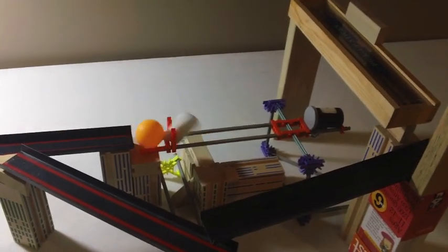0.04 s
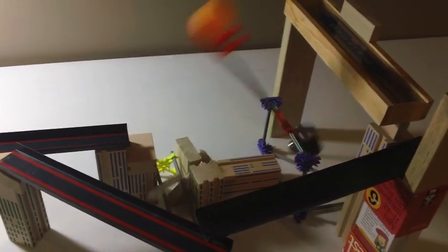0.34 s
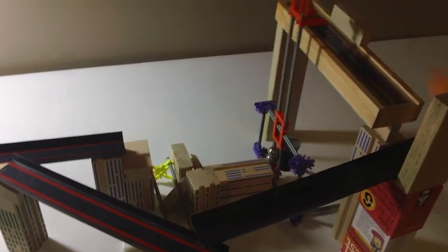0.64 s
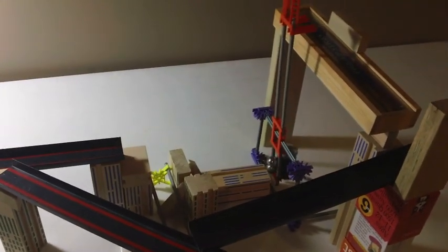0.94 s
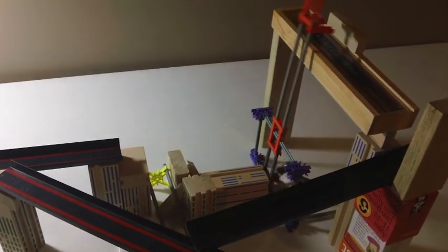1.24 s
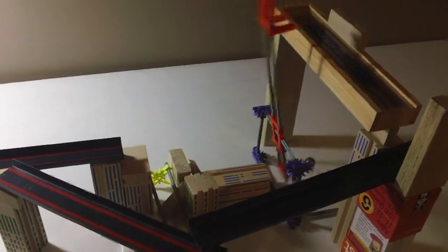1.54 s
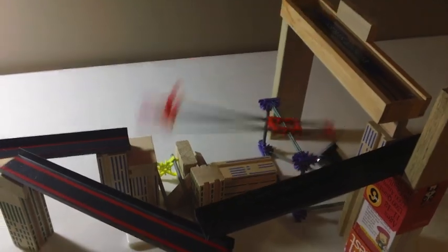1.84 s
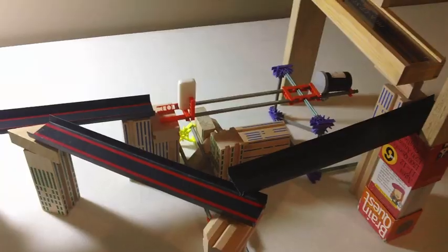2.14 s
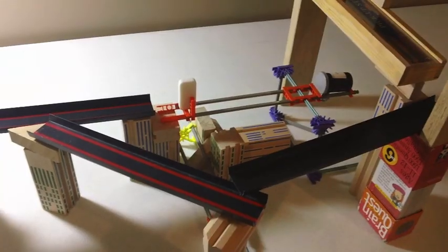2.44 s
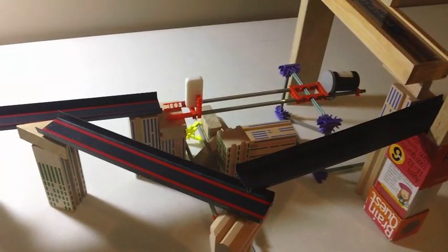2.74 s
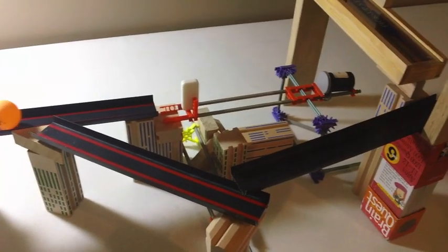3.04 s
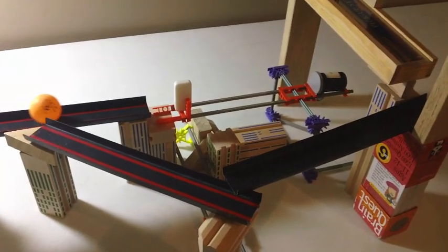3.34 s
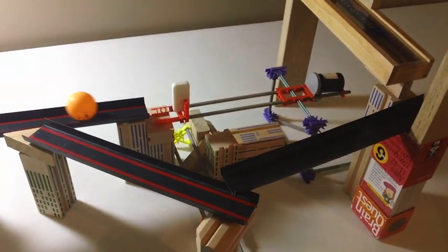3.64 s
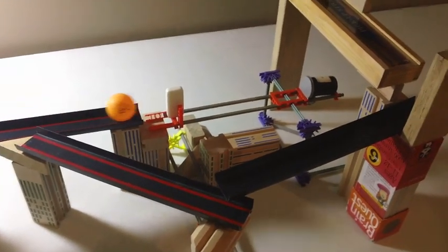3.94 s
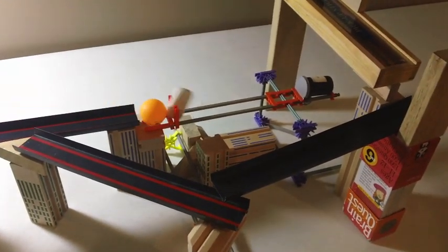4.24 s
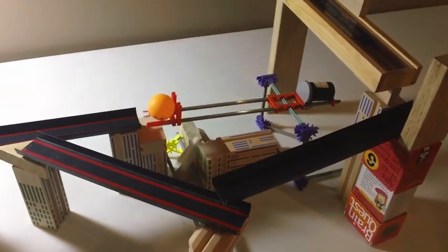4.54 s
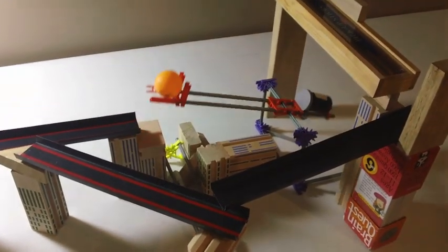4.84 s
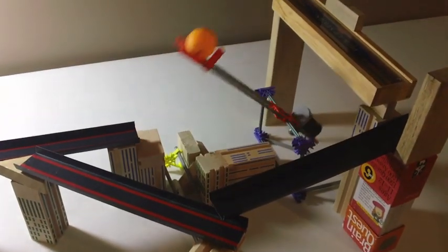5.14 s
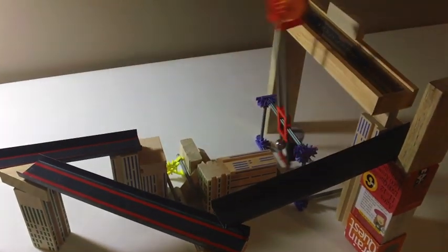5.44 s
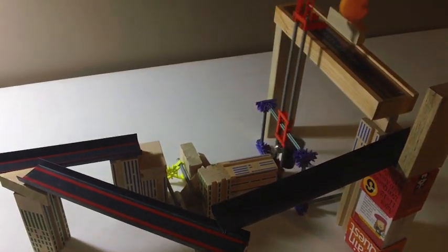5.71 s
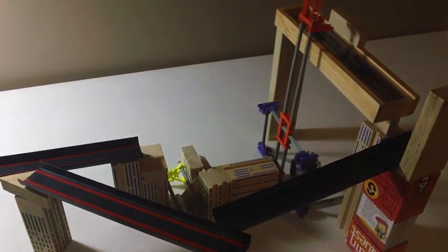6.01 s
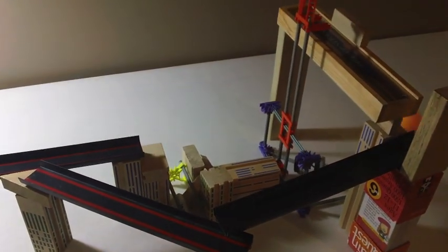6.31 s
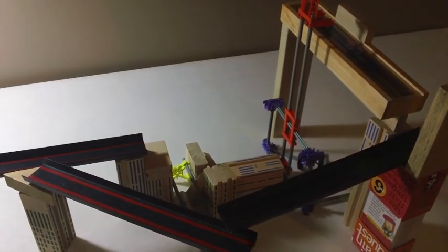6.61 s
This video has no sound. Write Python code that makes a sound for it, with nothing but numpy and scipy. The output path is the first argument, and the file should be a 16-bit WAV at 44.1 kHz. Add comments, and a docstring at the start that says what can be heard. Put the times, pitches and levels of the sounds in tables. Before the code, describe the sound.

A tabletop chain-reaction machine runs twice in a small, lively room, heard up close. First a plastic lever arm clacks and rattles, and a quick, uneven string of hard wooden knocks follows. After a short dropout and a quiet stretch of room hiss, a light ball clacks a small block over and rolls briefly, and the lever clinks. The ball then hops along a wooden trough, knocks loudly and bounces away.

```python
"""A light ball runs a tabletop chain-reaction machine: two tries, a short silence between.
It rolls onto a weighted lever arm, which tips, rattles and knocks against a wooden frame;
the ball is flung along a wooden trough and bounces away over blocks and table.
Each contact is a noise burst coloured by the struck body, with the table ringing along.
Small, lively room; a close camera with automatic gain."""
import sys
import numpy as np
from scipy import signal
from scipy.fft import rfft, irfft, next_fast_len
from scipy.io import wavfile

SR = 44100
rng = np.random.default_rng(int(sys.argv[2]) if len(sys.argv) > 2 else 0)


def store_wav(level_fs):
    """Save 16-bit WAV to argv[1]."""
    pcm = np.round(np.clip(np.atleast_2d(level_fs), -1, 1) * 32767)
    wavfile.write(sys.argv[1], SR, pcm.T.astype(np.int16))


N = 302967

# limits of the bass, thud, knock, clack and tick bands (edge [Hz])
EDGES_HZ = [60, 200, 600, 1800, 5000, 16000]
# contact spectra (frequency [Hz], gain [dB])
WOOD_EQ = [(40, -38.5), (75, -38.5), (130, -14), (200, -14), (300, 0), (850, -2), (1300, -7), (2050, -16.5),
           (2850, -10.5), (3500, -21.5), (4200, -20.5), (7000, -33.5), (15000, -38)]
PLASTIC_EQ = [(40, -23.5), (180, -17.5), (300, -4), (850, -3), (1400, -10.5), (3200, -11), (6500, -17),
              (8300, -16.5), (15000, -27)]
HOLLOW_EQ = [(40, -37.5), (250, -6.5), (800, 3.5), (1300, -3), (3000, -8), (4000, -12.5), (7000, -17),
             (15000, -24.5)]
# resonances (centre [Hz], width [Hz], lift [dB])
ARM_PEAKS = [(3900, 120, 6), (5640, 80, 7), (7150, 60, 13), (10180, 90, 17)]
BALL_PEAKS = [(8460, 130, 7), (9080, 170, 15.5), (10070, 160, 15), (11550, 850, 12), (13660, 360, 17),
              (14700, 230, 12.2)]


def amp(db):
    """Decibels to gain."""
    return 10 ** (np.asarray(db) / 20)


def unit(x):
    """Scale to rms 1."""
    return x / np.sqrt(np.mean(x ** 2) + 1e-20)


def along(points, hz):
    """Interpolate (frequency [Hz], value) on a log axis."""
    points_hz, values = np.transpose(points)
    return np.interp(np.log(hz + 1), np.log(points_hz + 1), values)


def coloured(x, eq, peaks=()):
    """Minimum-phase filter; narrow peaks lift the curve and ring on."""
    m = 2 * next_fast_len(len(x) // 2 + 2048)
    hz = np.fft.rfftfreq(m, 1 / SR)
    lift = sum(amp(db) ** 2 / (1 + (2 * (hz - centre) / width) ** 2) for centre, width, db in peaks)
    cepstrum = irfft(np.log(amp(along(eq, hz)) * np.sqrt(1 + lift)))
    cepstrum[1:m // 2] *= 2
    cepstrum[m // 2 + 1:] = 0
    return irfft(rfft(x, m) * np.exp(rfft(cepstrum)), m)[:len(x)]


def add(track, start_s, sound):
    """Mix a sound into the track."""
    part = track[max(0, round(start_s * SR)):][:len(sound)]
    part += sound[:len(part)]


def burst(t, t60_s):
    """Decaying white noise."""
    return amp(-60 * t / t60_s) * rng.standard_normal(len(t))


def air(rumble_db=-57.5, hiss_db=-59.5):
    """Steady room rumble and soft hiss."""
    # noise spectra (frequency [Hz], gain [dB])
    rumble_eq = [(15, -61.5), (25, -30.5), (54, -6), (91, -7), (124, 3.5), (159, -4), (462, -7.5),
                 (499, -8.5), (1000, -26.5), (1300, -45), (2200, -120)]
    hiss_eq = [(350, -31.5), (600, -2.5), (715, -3), (1310, -6.5), (8990, -18.5), (11500, -21),
               (12400, -26.5), (15000, -19)]
    rumble = unit(coloured(rng.standard_normal(N), rumble_eq))
    hiss = unit(coloured(rng.standard_normal(N), hiss_eq))
    return amp(rumble_db) * rumble + amp(hiss_db) * hiss


def room_tail(size):
    """Diffuse echo; treble dies first."""
    decay = [(100, 0.54), (400, 0.39), (1500, 0.37), (5000, 0.31), (15000, 0.25)]  # reverberation (frequency [Hz], t60 [s])
    hz, t, spectra = signal.stft(rng.standard_normal(size), SR, nperseg=256)
    spectra *= amp(-60 * t / along(decay, hz)[:, None])
    return signal.istft(spectra, SR, nperseg=256)[1][:size]


def table_ring(t, rise_s=0.005):
    """The table and the things on it ring, at new strengths for each blow."""
    modes = [(134, -13, 0.34), (232.8, -10, 0.24), (279, 1.5, 0.23), (351.4, -1.5, 0.26), (380, -0.5, 0.13),
             (408, -1, 0.29), (599, -8, 0.4), (782, -8.5, 0.33), (936, -10.5, 0.39)]  # (frequency [Hz], level [dB], t60 [s])
    tones = np.zeros(len(t))
    for hz, db, t60_s in modes:
        envelope = amp(db + rng.normal(0, 2) - 60 * t / t60_s)
        cycles = hz * rng.normal(1, .003) * t + rng.random()
        tones += envelope * np.sin(2 * np.pi * cycles)
    return tones * (1 - np.exp(-t / rise_s))


def band_levels(db, hardness_db_per_oct, balance_db, edges_hz):
    """Share a contact's level among the bands; harder is brighter."""
    octaves = np.log2(np.multiply(edges_hz[:-1], edges_hz[1:])) / 2
    gains = amp(balance_db + hardness_db_per_oct * octaves)
    return db + 20 * np.log10(gains / np.linalg.norm(gains))


def voiced(x, levels_db, edges_hz):
    """Filter a blow so that its first 30 ms approach the band levels."""
    head = x[:round(.03 * SR)]
    power = 2 * abs(rfft(head, SR // 10)) ** 2 / (len(head) * SR / 10)
    hz = np.fft.rfftfreq(SR // 10, 1 / SR)
    eq = [(np.sqrt(lo * hi), db - 10 * np.log10(power[(hz >= lo) & (hz < hi)].sum()))
          for lo, hi, db in zip(edges_hz, edges_hz[1:], levels_db)]
    return coloured(x, eq)


def blows(hits, balance_db, eq, peaks, crack_db, chatter_t60_s, room_db, table_db,
          crack_t60_s=0.0032, edges_hz=EDGES_HZ):
    """Crack, chatter and echo in the struck body's colour, plus table ring; gains relative to chatter."""
    track, t = np.zeros(N), np.arange(SR * 4 // 10) / SR
    for start_s, db, hardness in hits:
        crack = amp(crack_db) * burst(t, crack_t60_s)
        chatter = burst(t, chatter_t60_s)
        echo = amp(room_db) * room_tail(len(t)) * (1 - np.exp(-t / 0.0086))
        blow = coloured(crack + chatter + echo, eq, peaks) + amp(table_db) * table_ring(t)
        levels_db = band_levels(db, hardness, balance_db, edges_hz)
        for _ in range(2):  # bands overlap: two passes
            blow = voiced(blow, levels_db, edges_hz)
        add(track, start_s, blow)
    return track


def runs(spans, eq, peaks, contacts_per_s, spread_db):
    """Runs of tiny uneven contacts, blurred by the room."""
    track, t = np.zeros(N), np.arange(SR // 2) / SR
    for start_s, end_s, db in spans:
        size = round((end_s - start_s) * SR)
        touches = rng.random(size) < contacts_per_s / SR
        contacts = touches * amp(spread_db * rng.standard_normal(size))
        response = burst(t, t60_s=0.047) + amp(-11.5) * room_tail(len(t))
        run = coloured(signal.fftconvolve(contacts, response), eq, peaks)
        add(track, start_s, amp(db) * run / (np.std(run[:size]) + 1e-9))
    return track


def table_bumps():
    """Soft, dull bumps of the table."""
    hits = [(0.0, -42.5, 5.5), (.943, -29, 0.5), (1.013, -31, 3.5), (1.205, -26, -9.5), (1.352, -17, -1),
            (1.628, -22, 3), (1.885, -15, 0.5), (2.935, -41, -10.5), (3.01, -49, -7), (3.4, -47, -5),
            (5.39, -51.5, 5.5), (6.129, -22, 1), (6.192, -18.5, 4.5)]  # (time [s], level [dB], hardness [dB/oct])
    balance_db = [-8, 0, -14.5, -28, -40]  # (gain per band [dB])
    soft_eq = [(30, -13), (70, -7.5), (140, 10.5), (280, -3), (600, -11.5), (2500, -25.5), (12000, -43)]  # contact spectrum (frequency [Hz], gain [dB])
    return blows(hits, balance_db, soft_eq, [],
                 crack_db=-10.5, chatter_t60_s=.18, room_db=-5.5, table_db=-26)


def arm_rattle():
    """The loose arm rattles."""
    spans = [(.287, .36, -27), (1.2, 1.26, -41.5), (1.33, 1.44, -35.5)]  # (start [s], end [s], level [dB])
    return runs(spans, PLASTIC_EQ, ARM_PEAKS[:3], contacts_per_s=360, spread_db=-0.5)


def treble_ticks():
    """Short, bright ticks, most at the onset of a knock or jolt."""
    hits = [(1.079, -31, 9.5), (1.3145, -31, 7), (1.333, -26.5, 2), (1.855, -34, -8), (4.6998, -27.5, 9),
            (6.1111, -23, -2)]  # (time [s], level [dB], hardness [dB/oct])
    balance_db = [-10, 0]  # (clack band [dB], tick band [dB])
    tick_peaks = [(7500, 2700, 3.7), (13800, 1500, 13)]  # (centre [Hz], width [Hz], lift [dB])
    return blows(hits, balance_db, HOLLOW_EQ, tick_peaks,
                 crack_db=4.5, chatter_t60_s=0.074, room_db=-10.5, table_db=-50, edges_hz=EDGES_HZ[3:])


def lever_clinks():
    """Metal parts of the lever clink and ring."""
    hits = [(.2689, -24.5, -2), (.423, -28.5, 3.5), (4.7727, -14.5, 0)]  # (time [s], level [dB], hardness [dB/oct])
    balance_db = [-19, -2.5, 2, -2, -0.5]  # (gain per band [dB])
    metal_peaks = [(2300, 120, 6), (3080, 70, 8), (3490, 60, 8), (8510, 7, 20), (8620, 9, 15),
                   (9730, 10, 16)]  # (centre [Hz], width [Hz], lift [dB])
    return blows(hits, balance_db, PLASTIC_EQ, metal_peaks,
                 crack_db=5.5, chatter_t60_s=0.06, room_db=-12, table_db=-31.5)


def weight_jolts():
    """The weight jolts in its holder."""
    hits = [(1.1813, -18.5, 1.1), (1.191, -21, -0.1), (1.2626, -22, -0.2), (1.3155, -21, -1.3)]  # (time [s], level [dB], hardness [dB/oct])
    balance_db = [-19, -1, 1.5, 0.5, -13.5]  # (gain per band [dB])
    holder_peaks = [(3025, 150, 16.3), (3480, 99, 11), (4700, 120, 7.6)]  # (centre [Hz], width [Hz], lift [dB])
    return blows(hits, balance_db, PLASTIC_EQ, holder_peaks,
                 crack_db=3, chatter_t60_s=.072, room_db=-11, table_db=-21.5)


def arm_clacks():
    """Sharp blows on the plastic arm."""
    hits = [(.1537, -15.5, 2), (.287, -20, .2)]  # (time [s], level [dB], hardness [dB/oct])
    balance_db = [-11.5, 3.5, -2.5, -1, -5]  # (gain per band [dB])
    return blows(hits, balance_db, PLASTIC_EQ, ARM_PEAKS,
                 crack_db=17, chatter_t60_s=0.12, room_db=-7, table_db=-24, crack_t60_s=0.0025)


def ball_roll():
    """The ball rolls: dense, uneven contacts."""
    spans = [(.37, .6, -30), (4.548, 4.771, -31.5), (5.87, 5.92, -41.5), (5.97, 6.11, -35.5)]  # (start [s], end [s], level [dB])
    roll_eq = [(40, -30.5), (140, -4.5), (700, 9.5), (1400, -4), (2500, -1), (4000, -12.5), (8000, -22.5),
               (15000, -37)]  # spectrum (frequency [Hz], gain [dB])
    return runs(spans, roll_eq, [], contacts_per_s=310, spread_db=7)


def ball_pings():
    """The ball pings on plastic track and cradle."""
    hits = [(.372, -30.5, .9), (1.7625, -38.5, -0.3), (3.3444, -46.5, -0.9), (3.4112, -47.5, 1.2),
            (4.63, -29.7, 1.3), (4.6629, -31, 1.5)]  # (time [s], level [dB], hardness [dB/oct])
    balance_db = [-2, -3, -2.5, -1, -11.5]  # (gain per band [dB])
    track_peaks = [(2420, 120, 13)]  # (centre [Hz], width [Hz], lift [dB])
    return blows(hits, balance_db, HOLLOW_EQ, track_peaks,
                 crack_db=10, chatter_t60_s=0.11, room_db=-8, table_db=-21.5)


def ball_taps():
    """Light contacts ring ball and cup."""
    hits = [(.523, -22.5, -1.5), (.9683, -39.5, 1), (1.0586, -37, -0.5), (1.294, -30, -3),
            (1.5465, -27.5, 0), (1.5854, -31.5, -0.5), (4.2074, -34.5, 0.1), (4.5841, -29.5, 0.8)]  # (time [s], level [dB], hardness [dB/oct])
    balance_db = [-10, -6.5, 0, -4, -3]  # (gain per band [dB])
    cup_peaks = [(2500, 150, 4.6)]  # (centre [Hz], width [Hz], lift [dB])
    return blows(hits, balance_db, HOLLOW_EQ, BALL_PEAKS + cup_peaks,
                 crack_db=8.5, chatter_t60_s=0.087, room_db=-7.5, table_db=-22.5)


def ball_hops():
    """The ball hops along the wooden trough."""
    hits = [(5.6038, -40, 0.7), (5.6771, -29, 0), (5.7669, -27.5, 1), (5.8203, -35, 0.5),
            (5.8537, -36, -1.5), (6.014, -30.5, -2.6), (6.0762, -30, -2.5)]  # (time [s], level [dB], hardness [dB/oct])
    balance_db = [-9, -6.5, -1, 1, -7.5]  # (gain per band [dB])
    trough_peaks = [(1627, 110, 10.7), (2144, 86, 8.8), (5440, 170, 7.7)]  # (centre [Hz], width [Hz], lift [dB])
    return blows(hits, balance_db, HOLLOW_EQ, BALL_PEAKS + trough_peaks,
                 crack_db=5, chatter_t60_s=0.084, room_db=-10.5, table_db=-21.5)


def block_topple():
    """The ball tips a small block over."""
    hits = [(4.4349, -10, -0.5)]  # (time [s], level [dB], hardness [dB/oct])
    balance_db = [-14, -0.5, 1.5, -1, -11.5]  # (gain per band [dB])
    return blows(hits, balance_db, PLASTIC_EQ, [],
                 crack_db=13, chatter_t60_s=0.076, room_db=-6.5, table_db=-25.5, crack_t60_s=0.0011)


def ball_bounces(start_s=6.4897, first_db=-13.5, flight_s=.2097, restitution=.708, loss_db=2.5):
    """The ball bounces away; flights shorten and landings weaken by constant ratios."""
    balance_db = [-17.5, -2, 0.5, -9, -14.5]  # (gain per band [dB])
    block_peaks = [(1230, 65, 3.5), (1970, 64, 5.1), (2820, 380, 5.9)]  # (centre [Hz], width [Hz], lift [dB])
    hits = [(start_s + flight_s * (1 - restitution ** k) / (1 - restitution), first_db - loss_db * k, 0)
            for k in range(3)]
    return blows(hits, balance_db, WOOD_EQ, BALL_PEAKS + block_peaks,
                 crack_db=-1, chatter_t60_s=0.1, room_db=-8, table_db=-23)


def wood_knocks():
    """Hard blows on wood, with the ball's resonances."""
    hits = [(.315, -17, 2), (.488, -12, -0.36), (.5478, -15.5, 1), (.6218, -12.5, 2.5), (.7395, -11, 1.33),
            (1.08, -15, 1), (1.086, -16.5, 0.5), (1.338, -10.5, -2.1), (1.8325, -23, -2), (1.871, -13, 0),
            (4.7213, -17, 1), (5.9305, -21.5, 0.4), (5.952, -14.5, 1), (6.1145, -14, -2),
            (6.18, -10.5, 0.46)]  # (time [s], level [dB], hardness [dB/oct])
    balance_db = [-14.5, 0.5, -1, -8.5, -17]  # (gain per band [dB])
    return blows(hits, balance_db, WOOD_EQ, BALL_PEAKS,
                 crack_db=3, chatter_t60_s=0.1, room_db=-9, table_db=-23.5)


def scene():
    """The machine in its room, mono."""
    bass_cut = [(25, -10), (60, -6), (120, -2.5)]  # thins the contacts' deep bass (frequency [Hz], gain [dB])
    machine = (ball_roll() + arm_rattle() + wood_knocks() + ball_bounces() + arm_clacks()
               + block_topple() + weight_jolts() + lever_clinks() + treble_ticks()
               + ball_taps() + ball_pings() + ball_hops() + table_bumps())
    return (coloured(machine, bass_cut) + air())[None]


def gain_control(x, boost_db=10.5, ceiling_db=-11, recovery_db_per_s=8, detector_s=0.0031):
    """Loud blows duck the gain; it recovers steadily, so room noise swells in the gaps."""
    pole = np.exp(-1 / (detector_s * SR))
    level_db = 10 * np.log10(signal.lfilter([1 - pole], [1, -pole], x ** 2) + 1e-12)
    recovered_db = recovery_db_per_s * np.arange(N) / SR
    held_db = np.maximum.accumulate(level_db + recovered_db, axis=-1) - recovered_db
    return x * amp(np.minimum(boost_db, ceiling_db - held_db))


def pause(start_s=1.913, end_s=2.092, fade_out_s=.016, fade_in_s=0.13, floor_db=-56):
    """Gain that fades out and back in between the tries."""
    t = np.arange(N) / SR
    return np.clip(np.maximum((start_s - t) / fade_out_s, (t - end_s) / fade_in_s), amp(floor_db), 1)


def record(dry, notch_hz=12550, notch_half_width_hz=520, notch_db=-22, top_hz=15350):
    """Camera: automatic gain, soft clip, pause, treble notch, steep low-pass."""
    x = gain_control(dry)
    clipped = x / (1 + abs(x) ** 6) ** (1 / 6)
    m = next_fast_len(N + SR // 2)
    hz = np.fft.rfftfreq(m, 1 / SR)
    notch = amp(notch_db / (1 + ((hz - notch_hz) / notch_half_width_hz) ** 2))
    low_pass = 1 / np.sqrt(1 + (hz / top_hz) ** 300)
    return irfft(rfft(pause() * clipped, m) * notch * low_pass, m)[..., :N]


dry = scene()
out = record(dry)
store_wav(out)
```